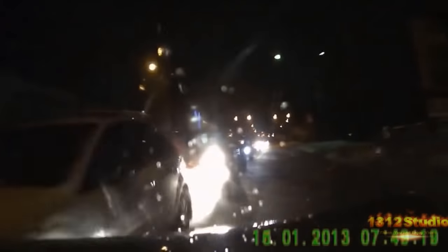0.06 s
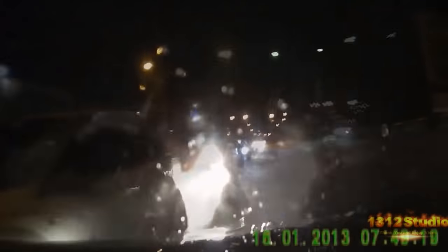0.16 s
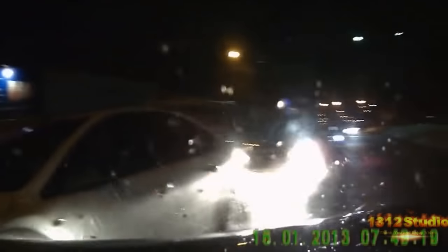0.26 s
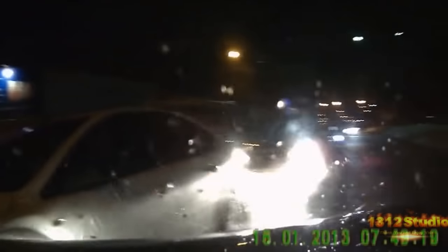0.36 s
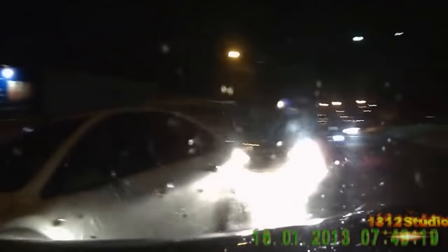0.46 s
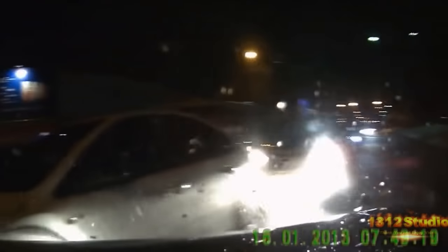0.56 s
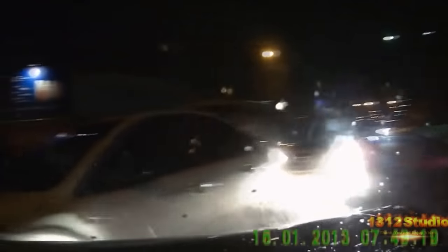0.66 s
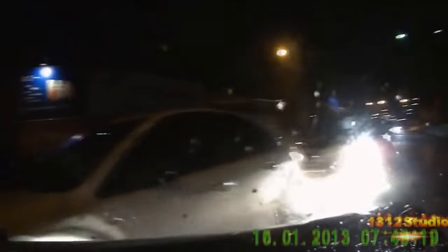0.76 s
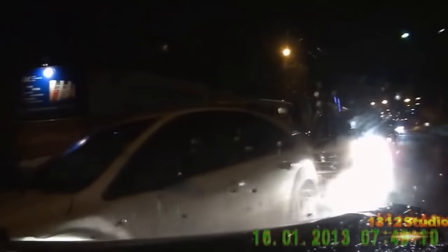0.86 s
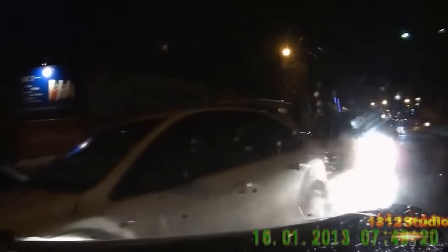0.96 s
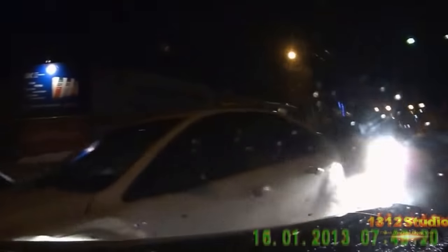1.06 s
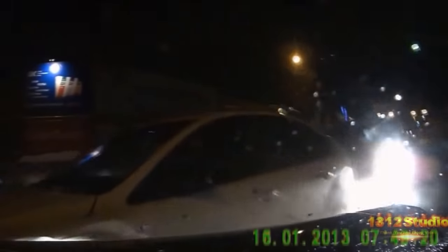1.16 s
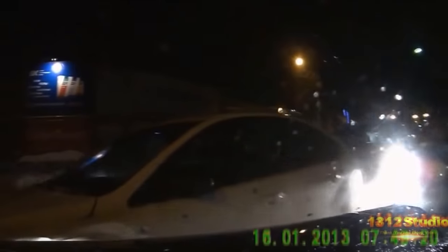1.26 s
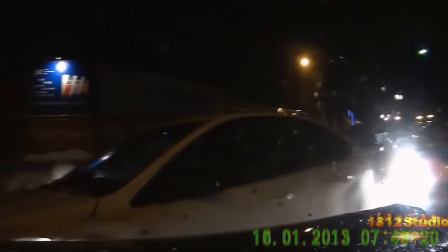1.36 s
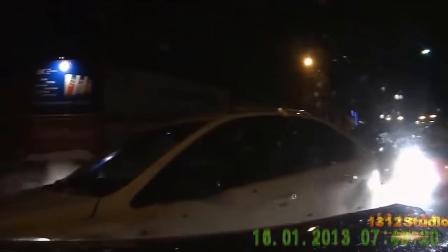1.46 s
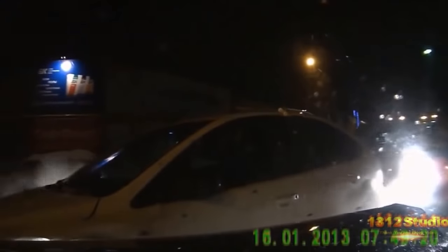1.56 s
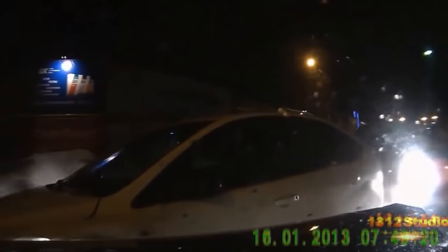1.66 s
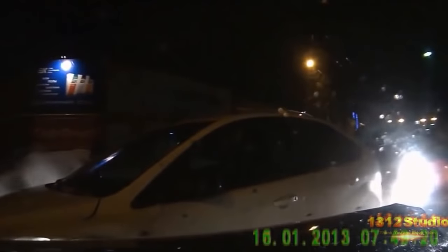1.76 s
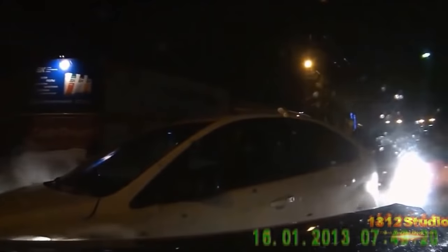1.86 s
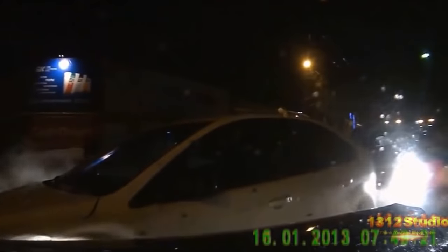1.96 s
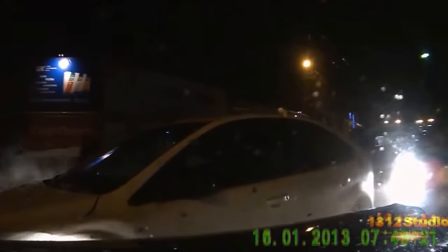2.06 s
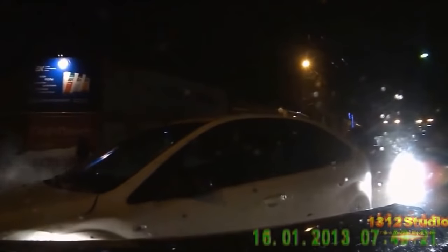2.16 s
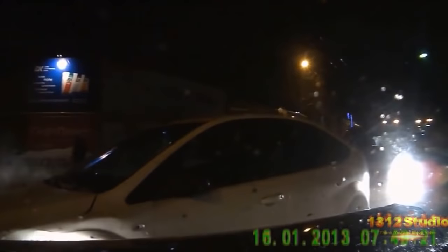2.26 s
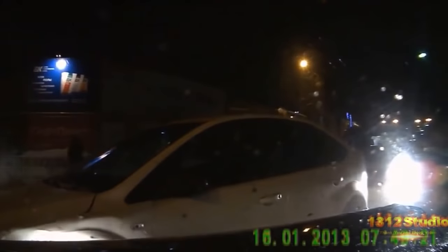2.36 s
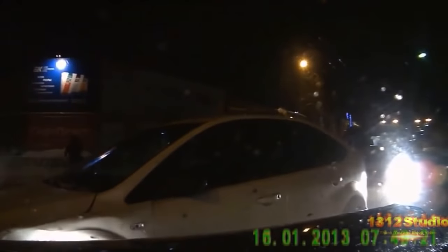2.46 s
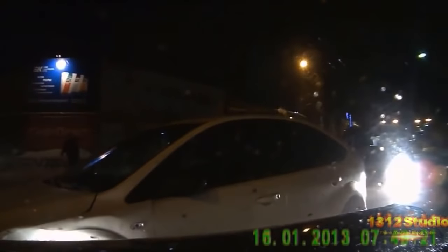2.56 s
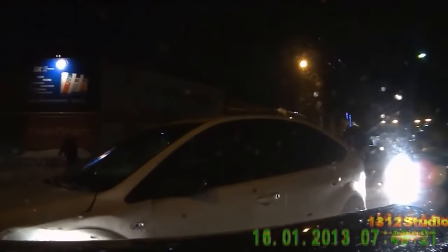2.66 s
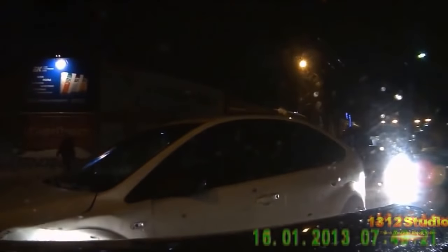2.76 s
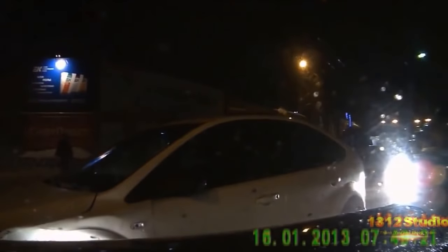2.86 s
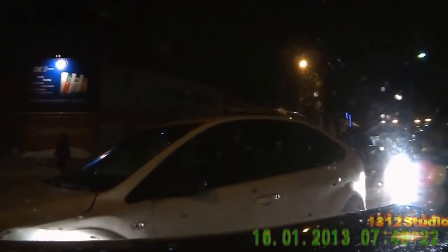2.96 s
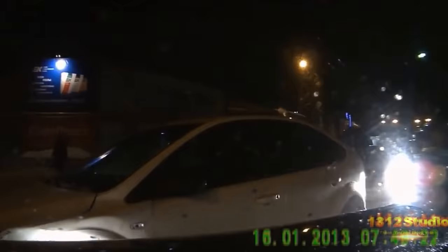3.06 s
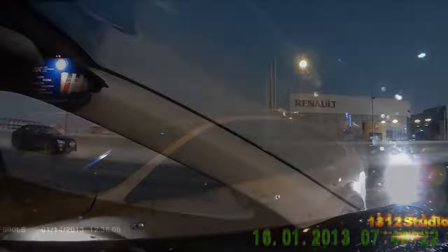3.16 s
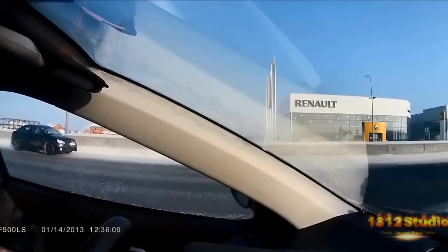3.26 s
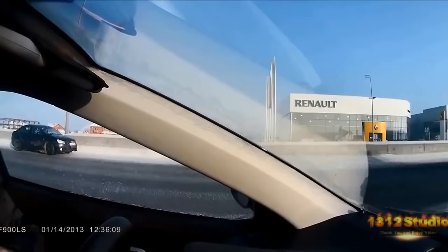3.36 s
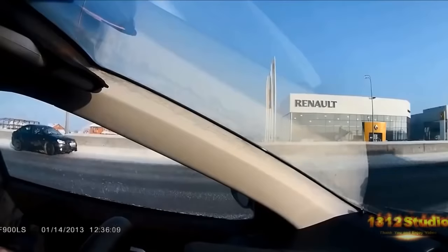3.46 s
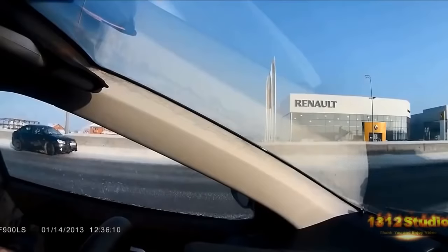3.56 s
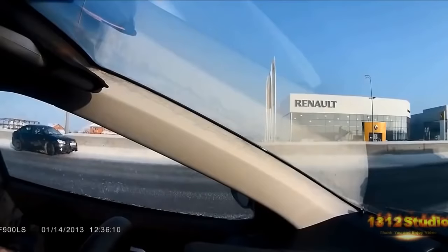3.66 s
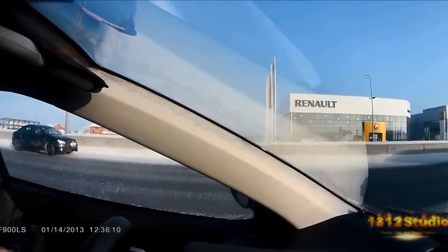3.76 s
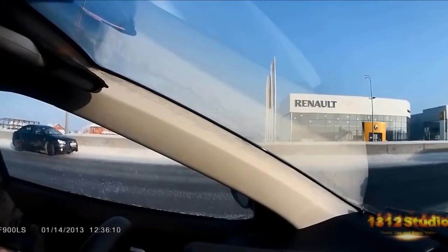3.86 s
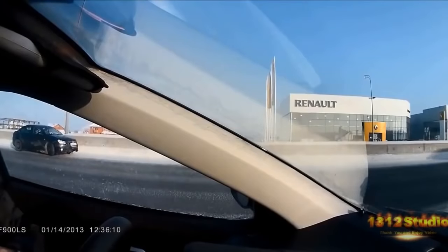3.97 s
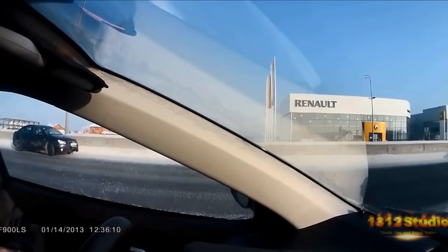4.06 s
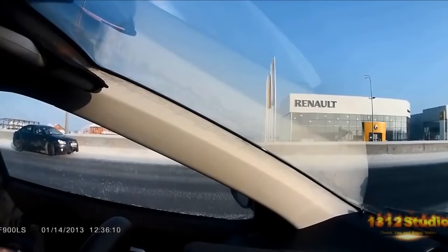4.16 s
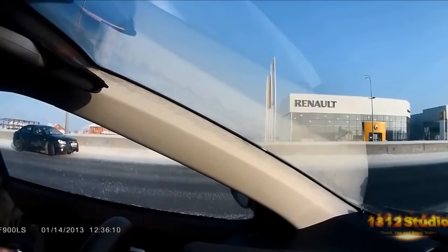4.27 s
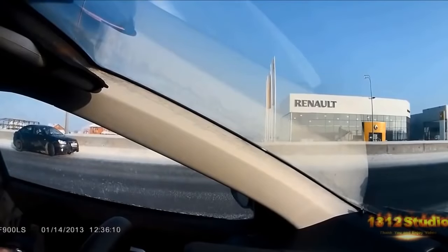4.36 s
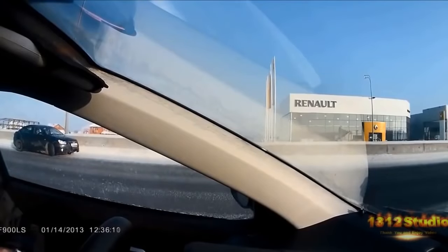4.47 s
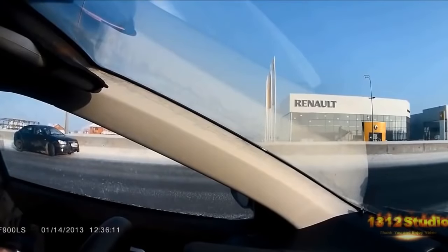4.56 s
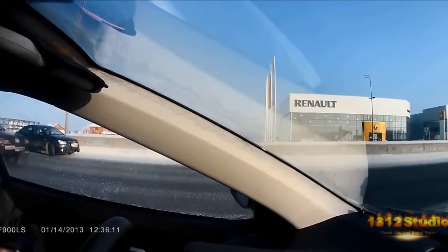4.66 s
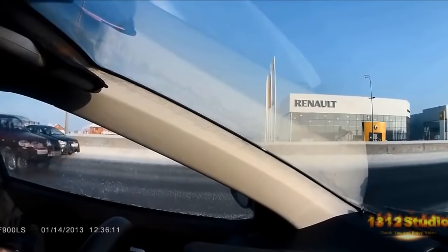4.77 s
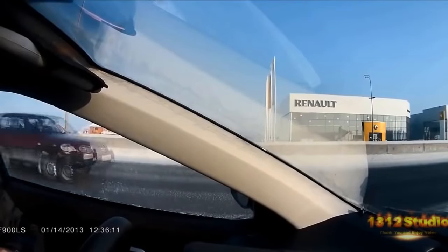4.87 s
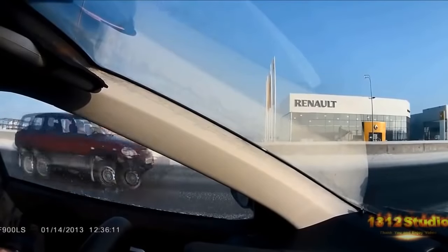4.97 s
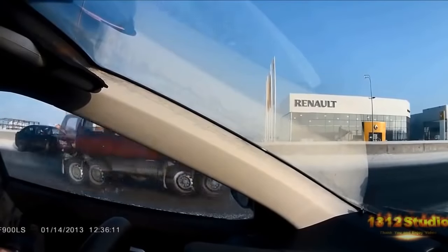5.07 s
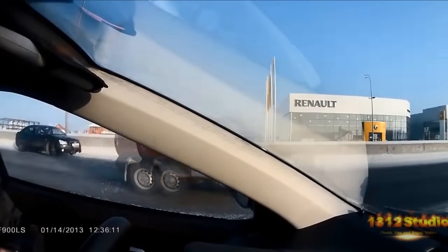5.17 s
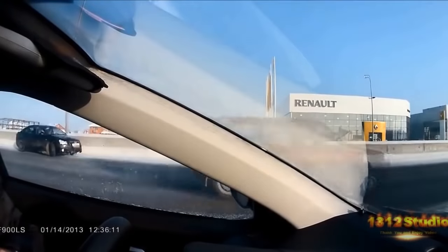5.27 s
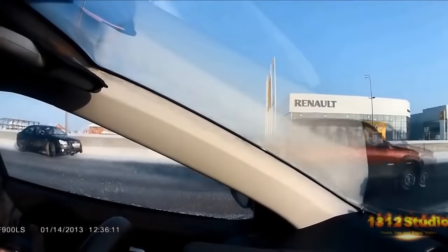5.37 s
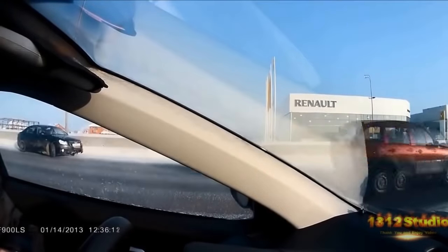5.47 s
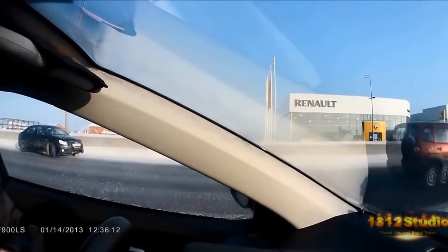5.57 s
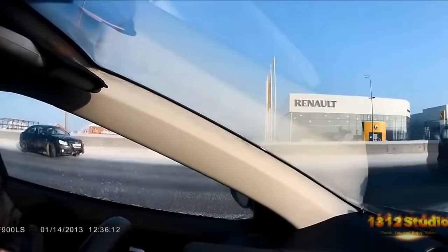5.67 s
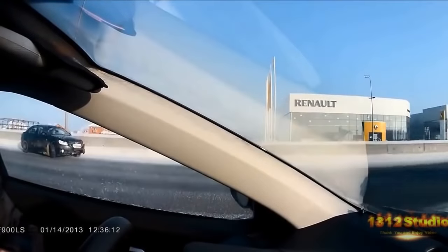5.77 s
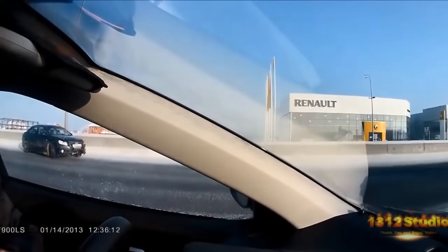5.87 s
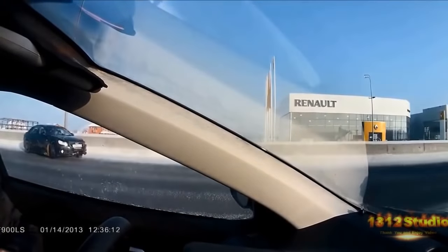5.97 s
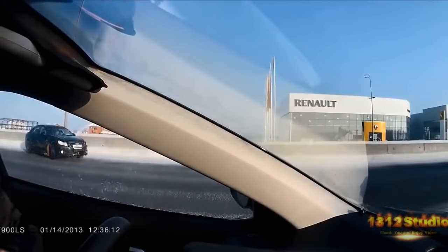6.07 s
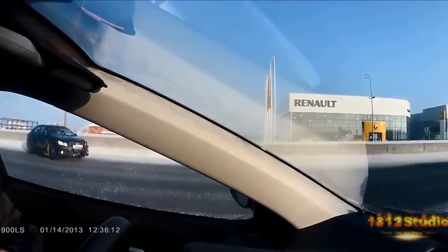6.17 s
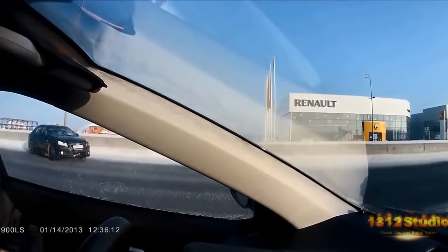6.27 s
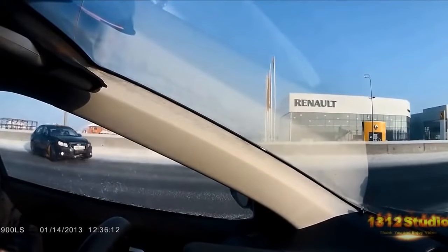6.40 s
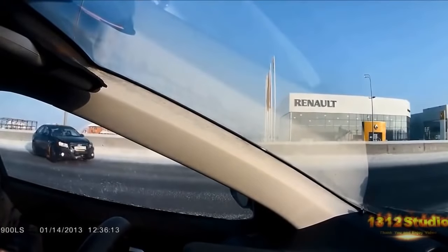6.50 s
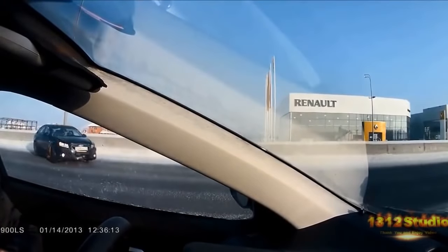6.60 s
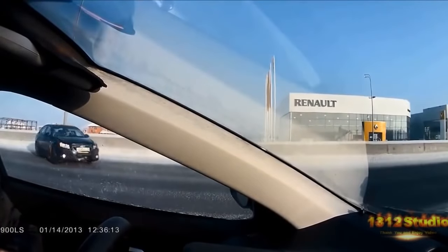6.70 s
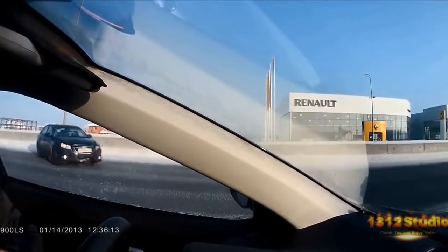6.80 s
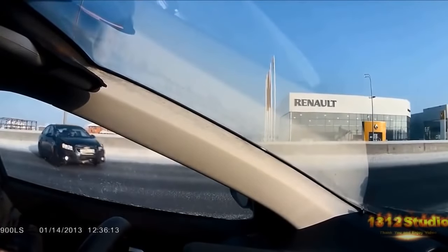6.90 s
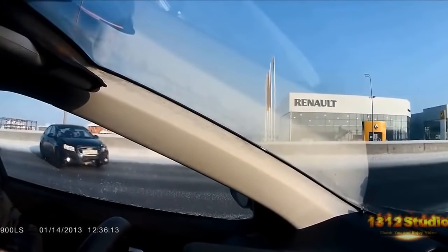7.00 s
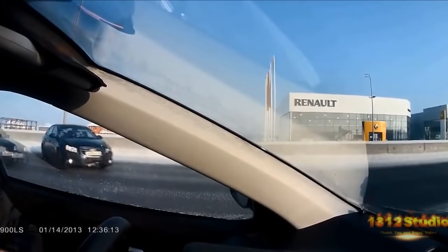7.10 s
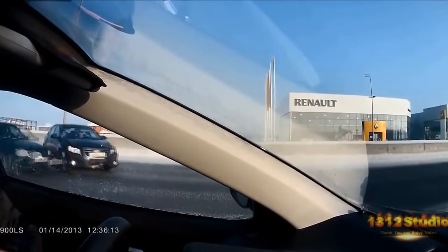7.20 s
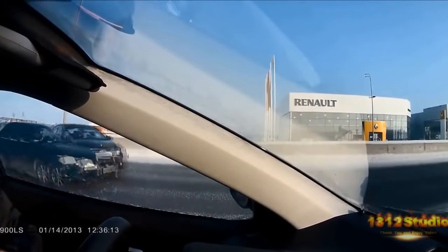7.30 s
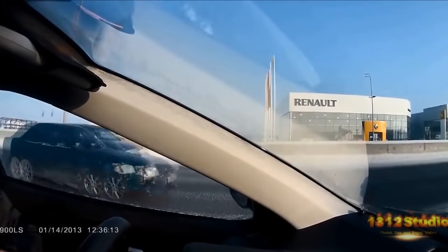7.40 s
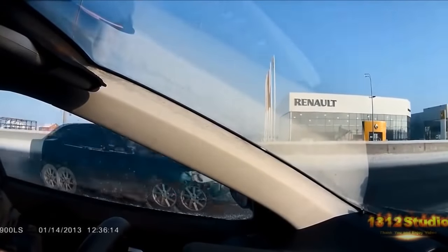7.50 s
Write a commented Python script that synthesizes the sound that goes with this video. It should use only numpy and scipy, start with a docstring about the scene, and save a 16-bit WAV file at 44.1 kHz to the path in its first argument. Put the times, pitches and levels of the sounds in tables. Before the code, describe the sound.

Inside a car, a collision begins at once: small cracks, then a dense, clipped burst of metal crunching, booming and body shudder lasting under a second. Loose pieces knock and settle, leaving a low engine throb and faint blower hum. An abrupt cut brings a brighter microphone in a parked car, with soft muffled traffic, one vehicle passing, tiny trim ticks, and finally a swelling heavy thud with crunch and glassy shatter.

```python
"""Night collision, then a parked car

Inside a car, a crash shakes the body, crushes panels and overloads a narrow-band dash camera; debris
settles, and an idling engine and a blower are heard. A cut leads to a second camera in a parked car by a
busy road: a vehicle passes, trim ticks, and a new impact swells at the end.
Shaped noise makes the crunches, roars and hisses; fading or unsteady sines make the knocks and hums."""
import sys
import numpy as np
from scipy import signal
from scipy.fft import rfft, irfft, next_fast_len
from scipy.io import wavfile
from scipy.ndimage import uniform_filter1d

SR = 44100
rng = np.random.default_rng(int(sys.argv[2]) if len(sys.argv) > 2 else 0)


def transcribe(u):
    """Save the signal u as a 16-bit wav file named by the first command-line argument.

    u: samples, shape (n,) or (channels, n), limited to [-1, 1]; the rate is SR.
    q: integer samples, one column per channel.
    """
    v = np.clip(np.atleast_2d(u).T, -1, 1)
    q = np.round(v * 32767).astype(np.int16)
    wavfile.write(sys.argv[1], SR, q)


N = 332494  # samples
CUT_S = 3.294  # the second camera takes over

# In all tables, fade_s is the time to die away by 60 dB.
# Shaking of the first car between blows: [time_s, floor_boom_db, panel_crush_db]
SHAKE = [(0.0, -15, -30.5), (0.07, -20.5, -29.5), (0.17, -34, -36.5), (0.22, -13.5, -14.5),
         (0.31, -11, -15), (0.42, -8, -17), (0.53, -18.5, -28.5), (0.64, -13, -18), (0.69, -22.5, -32),
         (0.9, -20, -28.5), (1.06, -22.5, -43.5), (1.2, -32.5, -44), (1.5, -43.5, -49.5),
         (1.82, -41.5, -52), (1.86, -50, -59.5), (1.92, -47, -49.5), (2.6, -48.5, -55), (3.29, -50, -60)]
# Tone colour of the floor boom: [pitch_hz, level_db_per_hz]
BOOM_COLOUR = [(41, -29), (70, 3.5), (97, -13), (140, -5.5), (221, -16.5), (290, -20), (373, -25),
               (600, -26), (780, -53), (1320, -120)]
# Tone colour of the crumpling metal: [pitch_hz, level_db_per_hz]
CRUSH_COLOUR = [(180, -30.5), (300, 5.5), (653, -2), (869, -2), (1260, -1.5), (1360, 1), (2410, -10),
                (2720, -2.5), (3170, -18.5), (3730, -14.5), (4120, -24.5), (5360, -58.5), (9060, -120)]
# Ringing of bent sheet metal: [pitch_hz, width_hz, level_db]
PANEL_RINGS = [(870, 59, -9), (1342, 86, 6), (1790, 84, -10.5), (2700, 280, 1), (3640, 31, -6.5),
               (4353, 42, -15.5)]
# Cracks of metal, plastic and loose things, with the rattle that follows; brittle top is relative to ring:
# [start_s, peak_db, pitch_hz, brittle_top_db, fade_s, rattle_db]
CRACKS = [(0.013, -13.5, 500, 2, 0.046, -26.5), (0.066, -21.5, 1480, -7, .045, -30),
          (0.114, -21, 1640, 0, 0.13, -42), (0.181, -11, 2420, -19, .02, -27),
          (0.205, 1, 2770, -4, 0.1, -30), (0.21, 5, 1270, -24, 0.039, -12.5),
          (0.214, 4.5, 2000, -20, 0.038, -14), (0.241, 2, 1500, -2.5, .034, -11.5),
          (0.259, 4, 1620, -8.5, 0.034, -19), (0.27, 0, 1210, 6.5, 0.036, -14),
          (0.282, -10.5, 1500, 6, .03, -23), (0.291, -8, 1440, -3, 0.095, -16),
          (0.314, -7, 2650, -2.5, 0.048, -15), (0.336, -9, 1560, -4, 0.067, -22),
          (0.389, -6.5, 1300, 0.5, .065, -22), (0.414, -2, 2670, -1, .07, -12.5),
          (0.44, -4.5, 1000, 10, .045, -18), (0.465, -14, 845, -21, .045, -30),
          (0.49, -10.5, 1820, -5, 0.026, -26), (0.497, -4, 1900, -8, .04, -20.5),
          (0.515, -3.5, 1920, -2, 0.056, -26), (0.567, -9, 2610, -12, 0.019, -28),
          (0.581, -6, 1880, -17, 0.011, -27), (0.596, -4, 2500, -6, 0.0094, -29),
          (0.629, -4.5, 900, 0.5, 0.053, -14), (0.644, -11, 2600, -7, 0.039, -29),
          (0.684, -22, 800, -10, .045, -30), (0.706, -23, 806, -12, 0.057, -34),
          (0.74, -4.5, 950, -32, 0.031, -18.5), (0.858, -20, 874, -8, 0.039, -22.5),
          (0.897, -10, 800, -31, 0.032, -21), (0.928, -25, 800, -13, 0.041, -27),
          (0.955, -24, 1740, 0, .04, -35.5), (0.984, -20, 700, -2, 0.069, -35),
          (1.075, -27.5, 752, -15, 0.042, -32.5), (1.127, -25, 1170, -11.5, 0.096, -32),
          (1.144, -22.5, 1710, -29, 0.055, -30.5), (1.228, -33, 1370, -26, .07, -48),
          (1.251, -29.5, 1150, 1, 0.076, -41), (1.339, -38.5, 1110, -14, .045, -49),
          (1.397, -40, 1500, -9, .045, -54), (1.473, -31.5, 1514, -26, .042, -39.5),
          (1.547, -33.5, 1520, -18.5, .04, -39.5), (1.763, -37.5, 1430, -10, 0.047, -44.5),
          (1.883, -43, 820, -17, .05, -46), (1.909, -36, 1470, -21, 0.042, -45),
          (1.984, -44.5, 818, -18, .06, -47), (2.074, -39.5, 1080, -2, 0.055, -51)]
CRACK_WIDTH = 0.3  # share of the crack's pitch
# Dull low knocks: [start_s, peak_db, start_pitch_hz, fade_s]
THUMPS = [(0.012, -8, 410, 0.057), (0.07, -11, 119.7, .1), (1.461, -27.5, 129.4, 0.51),
          (1.59, -25, 100, 0.14), (1.736, -13, 65.2, 0.067), (1.766, -31, 319, 0.081),
          (1.765, -35, 513, .08), (1.825, -34, 550, 0.058), (2.0, -39.5, 350, 0.25),
          (2.071, -30, 550, 0.068)]
# Jolts that rock the body on its springs and make it shudder: [peak_s, swing_db, shudder_db]
JOLTS = [(0.089, -12.5, -17.5), (0.26, -8.5, -11), (0.299, -17, -6.5), (0.41, -9, -21), (0.478, -3, -25),
         (0.562, -5, -13), (0.648, -12, -6), (0.711, -5, -23), (0.78, -12, -8), (0.9, -10, -14.5),
         (0.98, -13.5, -18.5), (1.17, -18.5, -31), (1.37, -25, -32), (1.55, -26.5, -34), (1.75, -31, -37),
         (1.88, -38, -33), (2.08, -24, -39.5)]
SWING_HZ, SHUDDER_HZ = 28.88, 54.6
JOLT_RISE_S, SWING_FADE_S, SHUDDER_FADE_S = 0.043, 0.4, 0.38
RATTLE_RISE_S, RATTLE_FADE_S = 0.0035, 0.16
RATTLE_BOOM_DB = 1.5  # the floor pan booms along with the rattle

# The new impact; crunch and shatter are relative to the thud: [time_s, thud_db, crunch_db, shatter_db]
IMPACT = [(7.455, -49, 6, -22), (7.466, -35, -2, -20), (7.476, -24, -15, -32), (7.488, -16, -15, -32),
          (7.508, -10, -14.5, -36), (7.525, -11, -16, -33), (7.54, -6, -17, -23)]
# Tone colour of the thud: [pitch_hz, level_db_per_hz]
THUD_COLOUR = [(20, -25), (55, -1), (90, -14), (135, -0.5), (210, -8), (290, 0), (440, -28), (585, -9.5),
               (720, -18.5), (930, -14), (1400, -32)]
# Separate blows within the impact: [start_s, level_db]
THUD_BLOWS = [(7.476, -18.5), (7.486, -11), (7.506, -10), (7.52, -6)]
# Knocks that make up each blow, levels relative to it: [start_pitch_hz, level_db, fade_s]
THUD_RING = [(135, -1.5, .09), (291, -1, 0.088), (574, -8, 0.061)]

# Resonances of the passing vehicle's roar: [pitch_hz, width_hz, level_db]
ROAR_MODES = [(712, 106, 1.5), (942, 120, 1.5), (415, 200, -2)]
ROAR_FAR_DB, ROAR_NEAR_DB = -56, -42.5
PASS_FROM_S, PASS_TO_S, PASS_EDGE_S = 4.92, 5.935, 0.2
# Small ticks of the trim, levels before the final smoothing: [start_s, peak_db]
TICKS = [(3.8626, -41), (4.3066, -53), (4.7694, -55), (5.4126, -48.5), (5.4435, -46.5), (5.6435, -51),
         (6.455, -44)]
# Tone colour of traffic through shut windows: [pitch_hz, level_db_per_hz]
ROAD_COLOUR = [(4, -22), (8, -4), (35, -7), (66, 0.5), (108, -0.5), (137, -4.5), (326, -7.5), (497, -11.5),
               (559, -10.5), (629, -15.5), (938, -12.5), (1080, -18), (1370, -15.5), (2040, -24),
               (2640, -23.5), (4120, -52.5), (5360, -100), (9060, -120)]
ROAD_DB = -37.5

# Resonances of the vent hiss: [pitch_hz, width_hz, level_db]
VENT_MODES = [(2470, 184, 0.41), (2760, 320, -1.2)]
# Changing strength of the vent hiss: [time_s, level_db]
VENT_LEVEL = [(3.29, -46.5), (3.6, -49.5), (4.0, -55.5), (5.1, -65), (5.9, -54.5), (6.25, -52.5),
              (6.7, -58.5), (7.54, -59)]
IDLE_HZ, IDLE_FROM_S, IDLE_DB = 28.6, 2.12, -26.5
IDLE_SAG_DB_PER_S, IDLE_LUMP_DB = -3, 0.5
# Overtones of the blower: [multiple_of_blower_hz, level_db]
BLOWER = [(2, -52), (3, -64), (4, -59), (5, -62), (6, -64), (9, -70), (10, -71), (12, -69)]
BLOWER_HZ = 69.4
# Overtones of the parked car's engine: [multiple_of_idle_hz, level_db]
PARKED_IDLE = [(1, -44), (2, -45), (3, -50)]
PARKED_IDLE_HZ = 23.15
# Faint short whistles: [start_s, end_s, start_pitch_hz, end_pitch_hz, level_db]
WHISTLES = [(2.43, 2.54, 1430, 1430, -58), (2.85, 3.14, 1497, 1497, -62), (2.5, 2.8, 790, 845, -67),
            (1.9, 2.35, 1490, 1490, -64), (2.5, 2.82, 945, 985, -69), (1.62, 1.9, 790, 810, -63),
            (1.62, 1.8, 480, 470, -59), (2.25, 2.8, 500, 480, -66)]
# Narrow bands of a brief hiss: [pitch_hz, width_hz, level_db]
SIZZLE = [(3410, 47, -72), (3713, 73, -62.5), (4170, 90, -76), (4420, 53, -76), (2890, 90, -69.5)]
SIZZLE_FROM_S, SIZZLE_TO_S = 2.0, 2.56

# Moments when the microphone bottoms out and its charge drains: [start_s, end_s, signed_start_height]
BLOCKS = [(.374, .388, -2.2), (.397, .406, 1.9), (.431, .439, -.4), (.444, .464, 2.1), (.477, .490, -.6),
          (.671, .683, -1.4), (.701, .707, .75)]
# Tone colour of the second camera's own noise: [pitch_hz, level_db_per_hz]
HISS_COLOUR = [(3000, -6), (3500, 0), (4500, -5), (6000, -6), (8000, -7), (11000, -9.5), (18000, -10.5)]
HISS_DB, WHINE_HZ, WHINE_DB = -66.5, 7720, -82.5
NIGHT_EDGE_HZ, EDGE_HZ = 4550, 15800  # top of the first camera's band, and of the whole sound


def wreck():
    """The first crash: everything the damaged car body does, added together."""
    rattle = blows(*np.transpose(CRACKS)[[0, -1]], RATTLE_RISE_S, RATTLE_FADE_S)
    return rocking_body() + booming_and_crumpling(rattle) + cracks_and_thumps()


def rocking_body():
    """Each jolt makes the body swing on its springs and shudder: two deep, unsteady tones."""
    jolt_s, swing_db, shudder_db = np.transpose(JOLTS)
    swing = blows(jolt_s, swing_db, JOLT_RISE_S, SWING_FADE_S)
    shudder = blows(jolt_s, shudder_db, JOLT_RISE_S, SHUDDER_FADE_S)
    out = swing * wobble(SWING_HZ, 0.2 * flicker(0.02))
    return out + shudder * wobble(SHUDDER_HZ, 0.15 * flicker(0.013))


def booming_and_crumpling(rattle):
    """The floor pan booms, and crumpling metal gives a lumpy stream of snaps that rings the panels."""
    boom_db, crush_db = curves(SHAKE)
    boom = colour(rng.standard_normal(N), BOOM_COLOUR)
    snaps = rng.standard_normal(N) * amp(2.6 * flicker(0.0023) + 1.9 * flicker(0.035))
    crush = evened(colour(snaps, CRUSH_COLOUR) + 0.14 * through(snaps, PANEL_RINGS))
    # hypot adds the power of the shaking and the rattle
    boom_level = np.hypot(amp(boom_db + 3.8 * flicker(0.017)), amp(RATTLE_BOOM_DB) * rattle)
    return boom_level * boom + np.hypot(amp(crush_db), rattle) * crush


def cracks_and_thumps():
    """Hard pieces crack as short ringing bursts; dull parts knock as fading low tones."""
    out = np.zeros(N)
    for s, db, hz, bright_db, fade_s, _ in CRACKS:
        add(out, s, burst(db, hz, max(fade_s, 0.01), CRACK_WIDTH * hz, bright_db))
    for s, db, hz, fade_s in THUMPS:
        add(out, s, knock(db, hz, fade_s, 0.0063))
    return out


def impact():
    """A swelling thud of low noise and knocks, with crunch and glassy shatter on top."""
    thud_db, crunch_db, shatter_db = curves(IMPACT)
    thud = colour(rng.standard_normal(N), THUD_COLOUR)
    snaps = rng.standard_normal(N) * amp(1.0 * flicker(0.0027))
    crunch = lowpass(through(snaps, [(2600, 760, 0), (1560, 570, 0.0048)]), 4000)
    glassy = [(3800, 7), (5000, -6), (7000, 5), (8500, -4), (11000, -11), (15700, -20)]
    shatter = colour(rng.standard_normal(N), glassy)
    layers = thud + amp(crunch_db) * crunch + amp(shatter_db) * shatter
    out = amp(thud_db) * layers * gate(7.44, N, 0.0063)
    for s, db in THUD_BLOWS:
        add(out, s, sum(knock(db + ring_db, hz, fade_s, 0.0027) for hz, ring_db, fade_s in THUD_RING))
    return out


def passing_vehicle():
    """A roar swells and fades as a vehicle passes: patchy noise through a few resonances."""
    near = gate(PASS_FROM_S, PASS_TO_S, PASS_EDGE_S)
    roar_db = ROAR_FAR_DB + (ROAR_NEAR_DB - ROAR_FAR_DB) * near
    roar = patchy(through(rng.standard_normal(N), ROAR_MODES), depth_db=1.5)
    return amp(roar_db + 1.1 * flicker(0.018)) * roar


def trim_ticks():
    """Pieces of trim tick: tiny, high bursts of noise, slightly smoothed."""
    out = np.zeros(N)
    for s, db in TICKS:
        add(out, s, lowpass(burst(db, 7800, 0.053, 3500, bright_db=-16), 11300))
    return out


def traffic():
    """Traffic through shut windows is a patchy wash of mostly low noise."""
    wash = patchy(colour(rng.standard_normal(N), ROAD_COLOUR), depth_db=1.5)
    return amp(ROAD_DB + 0.71 * flicker(0.025)) * wash


def vent():
    """The vent hisses: resonant noise whose strength rises and falls."""
    vent_db, = curves(VENT_LEVEL)
    hiss = lowpass(through(rng.standard_normal(N), VENT_MODES), 5000)
    return amp(vent_db + 2.0 * flicker(0.014)) * hiss


def idling_engine():
    """The first car's idle is a nearly pure low throb with an unsteady pitch."""
    since_start = np.arange(N) / SR - IDLE_FROM_S
    db = IDLE_DB + IDLE_SAG_DB_PER_S * since_start + IDLE_LUMP_DB * flicker(0.04)
    turns = 2 * np.pi * np.cumsum(IDLE_HZ * (1 + 0.0532 * flicker(0.0251))) / SR
    throb = np.sin(turns) + 0.15 * np.sin(2 * turns)
    return np.sqrt(2) * amp(db) * throb * gate(IDLE_FROM_S, N / SR, 0.089)


def blower():
    """The blower hums at multiples of one pitch, which drift together and waver separately."""
    out = np.zeros(N)
    drift = 0.0059 * flicker(0.089)
    for order, db in BLOWER:
        out += amp(db + 2.0 * flicker(0.05)) * wobble(order * BLOWER_HZ, drift + 0.004 * flicker(0.04))
    return out


def parked_engine():
    """The parked car's engine hums at multiples of one low, drifting pitch."""
    out = np.zeros(N)
    drift = 0.0059 * flicker(0.1)
    for order, db in PARKED_IDLE:
        out += amp(db + 1.2 * flicker(0.08)) * wobble(order * PARKED_IDLE_HZ, drift)
    return out


def whistles_and_sizzle():
    """Faint steady or gliding tones, and a brief hiss made of narrow bands of noise."""
    out = np.zeros(N)
    for t0, t1, f0_hz, f1_hz, db in WHISTLES:
        glide = np.interp(np.arange(N) / SR, [t0, t1], [f0_hz, f1_hz])
        level = amp(db + 3.1 * flicker(0.035)) * gate(t0, t1, 0.013)
        out += level * wobble(glide, 0.0029 * flicker(0.011))
    for hz, width, db in SIZZLE:
        band = evened(resonate(rng.standard_normal(N), hz, width))
        out += amp(db) * gate(SIZZLE_FROM_S, SIZZLE_TO_S, 0.032) * band
    return out


def second_camera_noise():
    """The second camera's own sound: patchy hiss and a faint electric whine."""
    hiss = patchy(colour(rng.standard_normal(N), HISS_COLOUR), depth_db=1.0)
    return amp(HISS_DB) * hiss + amp(WHINE_DB) * wobble(WHINE_HZ, 0.0005 * flicker(0.01))


def night_camera(x):
    """The microphone blocks after the heaviest blows; then a narrow band, and overload with a rounded knee."""
    t = np.arange(N) / SR
    for t0, t1, height in BLOCKS:
        before = t < t0
        reach = gate(t0 - 0.004, t1, 0.0045)  # the push builds up before the sound is lost
        drain = np.clip(height * np.exp(-np.maximum(t - t0, 0) / 0.0035), -1.0, 1.0)
        deaf = np.maximum(gate(t0 - 0.001, t1, 0.0009), reach * before * 0.44)
        x = x * (1 - 0.945 * deaf) + drain * np.where(before, reach, gate(0, t1, 0.00087))
    x = lowpass(np.clip(x, -1.3, 1.3), NIGHT_EDGE_HZ) / 1.018
    x = 0.96 * x / (1 + abs(x) ** 12) ** (1 / 12)
    # a faint hiss rises around the loudest, overloaded moments
    loudest = uniform_filter1d(np.maximum(abs(x) - 0.8, 0), 600)
    hiss = loudest * rng.standard_normal(N)
    return x + amp(-18.5) * signal.lfilter([0.4], [1, -0.6], hiss)


def burst(db, hz, fade_s, width, bright_db):
    """A crack of noise that rings one resonance and the brittle top of the trim."""
    t = np.arange(int(0.25 * SR)) / SR
    hit = rng.standard_normal(len(t)) * amp(-60 * t / fade_s) * np.minimum(t / 0.00078, 1)
    ring = resonate(resonate(hit, hz, width), hz, 3 * width)
    top = resonate(resonate(hit, 2750, 820), 1900, 2500)
    sound = ring / abs(ring).max() + amp(bright_db) * top / abs(top).max()
    return amp(db) * sound / abs(sound).max()


def knock(db, hz, fade_s, rise):
    """A dull knock: a sine whose pitch sags as it dies."""
    t = np.arange(SR // 4) / SR
    level = amp(db - 60 * t / fade_s) * np.minimum(t / rise, 1)
    return level * np.sin(2 * np.pi * hz * t * (1 - 0.69 * t))


def blows(times, levels_db, rise, fade_s):
    """Level over time of blows that each swell to a peak and die away; overlapping powers add."""
    t = np.arange(N) / SR
    power = np.zeros(N)
    for s, db in zip(times, levels_db):
        after = t[round((s - rise) * SR):][:SR] - s
        fade = amp(db - 60 * np.maximum(after, 0) / fade_s)
        add(power, s - rise, (fade * np.clip(1 + after / rise, 0, 1)) ** 2)
    return np.sqrt(power)


def wobble(hz, depth):
    """An unsteady, nearly pure tone with an average strength (rms) of 1."""
    cycles = np.cumsum(hz * (1 + depth)) / SR + rng.random()
    return np.sqrt(2) * np.sin(2 * np.pi * cycles)


def flicker(seconds):
    """Random wandering: noise smoothed twice over the given time, rms 1."""
    size = int(seconds * SR)
    return evened(uniform_filter1d(uniform_filter1d(rng.standard_normal(N), size), size))


def patchy(x, depth_db):
    """Makes drifting louder and softer patches over time and pitch, rms 1."""
    z = signal.stft(x, nperseg=512)[2]
    field = uniform_filter1d(rng.standard_normal(z.shape), size=4, axis=0)  # across pitch
    field = evened(uniform_filter1d(field, size=12, axis=1))  # across time
    return evened(signal.istft(z * amp(depth_db * field), nperseg=512)[1][:N])


def colour(x, spectrum):
    """Shapes the tone colour by a spectrum, rms 1."""
    size = next_fast_len(N)
    f, db = np.transpose(spectrum)
    hz = np.arange(size // 2 + 1) * SR / size
    gain = amp(np.interp(np.log(hz + 1), np.log(f + 1), db, -120, -120))
    return evened(irfft(rfft(x, size) * gain, size)[:N])


def resonate(x, hz, width):
    """Shifts hz down to zero, smooths, and shifts back: a resonance of gain 1."""
    turn = np.exp(2j * np.pi * np.cumsum(hz * np.ones(len(x))) / SR)
    r = np.exp(-np.pi * width / SR)
    return 2 * (turn * signal.lfilter([1 - r], [1, -r], x / turn)).real


def through(x, modes):
    """Sends a sound through a set of steep resonances with alternating signs, rms 1."""
    total = 0
    for k, (hz, width, db) in enumerate(modes):
        ring = resonate(resonate(x, hz, width), hz, 2 * width)
        total = total + (-1) ** k * amp(db) * evened(ring)
    return evened(total)


def lowpass(x, hz):
    """Removes what lies above hz."""
    return signal.oaconvolve(x, signal.firwin(511, hz, window=("kaiser", 9), fs=SR), "same")


def gate(t0, t1, edge):
    """Opens from 0 to 1 after t0 and closes before t1, with straight ramps edge seconds long."""
    t = np.arange(N) / SR
    return np.clip(np.minimum(t - t0, t1 - t) / max(edge, 1e-4), 0, 1)


def curves(rows):
    """Joins table rows by straight lines over time, one curve per column after the time."""
    s, *columns = np.transpose(rows)
    return [np.interp(np.arange(N) / SR, s, c) for c in columns]


def amp(db):
    """Turns decibels into a plain multiplier."""
    return 10 ** (np.asarray(db) / 20)


def evened(x):
    """Scales a signal to an average strength (rms) of 1."""
    return x / np.sqrt(np.mean(x ** 2) + 1e-20)


def add(mix, s, sound):
    """Adds a sound into the mix at s seconds, cut off at the end."""
    part = mix[round(s * SR):][:len(sound)]
    part += sound[:len(part)]


def scene():
    """The crashed car through the first camera, then a quick cut to the parked car."""
    first = night_camera(wreck() + idling_engine() + blower() + whistles_and_sizzle())
    roadside = passing_vehicle() + trim_ticks() + traffic() + vent() + parked_engine()
    second = impact() + roadside + second_camera_noise()
    cut = gate(CUT_S - 0.002, N, 0.0023)
    return ((1 - cut) * first + cut * second)[None]


def record(dry):
    """A trace of steady noise, clipping near full scale, then the band limit."""
    noisy = dry[0] + amp(-93.5) * rng.standard_normal(N)
    return lowpass(np.clip(noisy, -0.98, 0.98), EDGE_HZ)[None]


dry = scene()
out = record(dry)
transcribe(out)
```